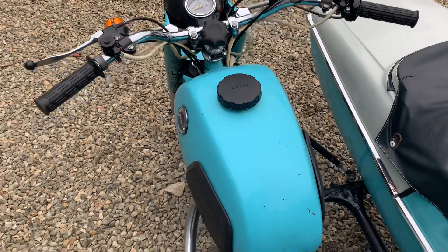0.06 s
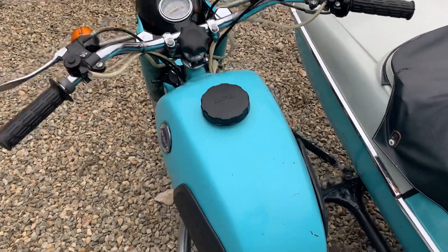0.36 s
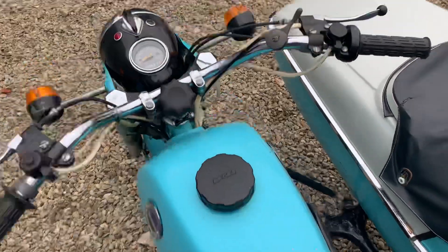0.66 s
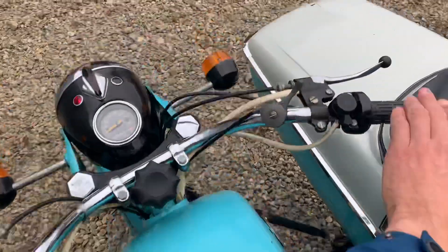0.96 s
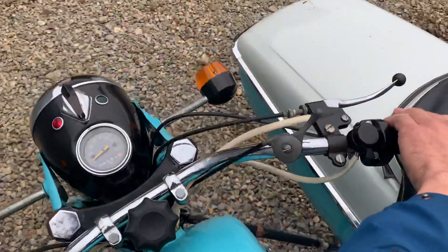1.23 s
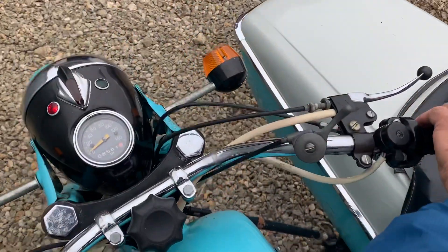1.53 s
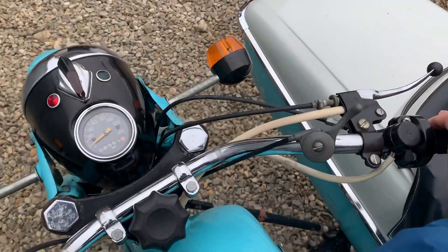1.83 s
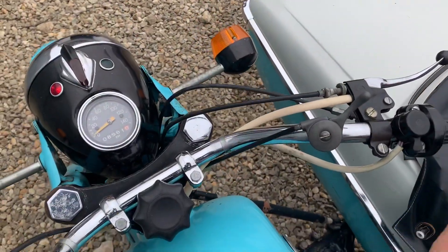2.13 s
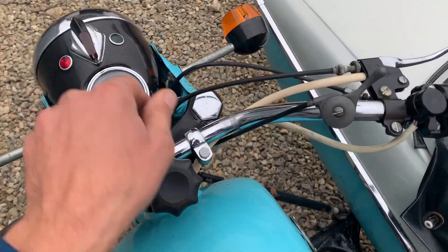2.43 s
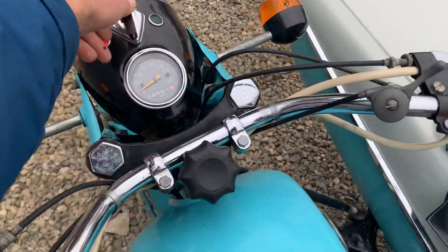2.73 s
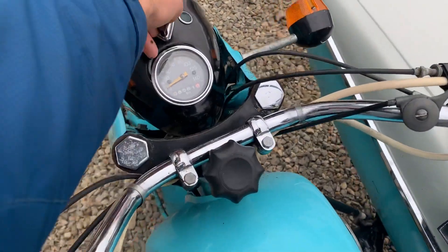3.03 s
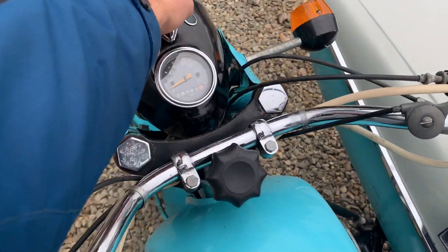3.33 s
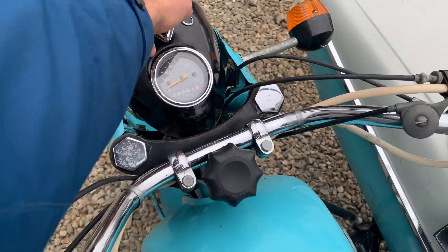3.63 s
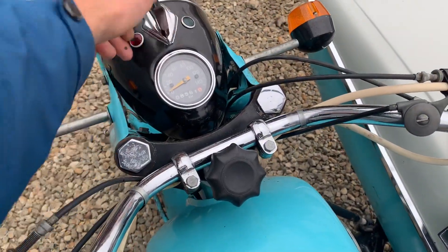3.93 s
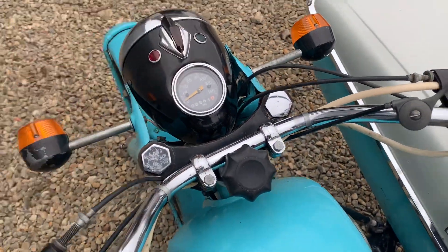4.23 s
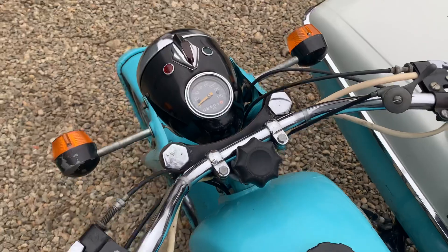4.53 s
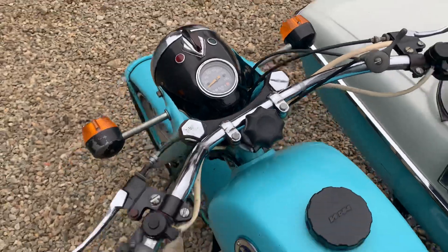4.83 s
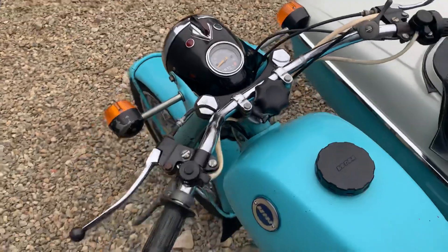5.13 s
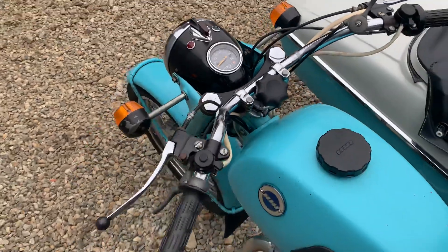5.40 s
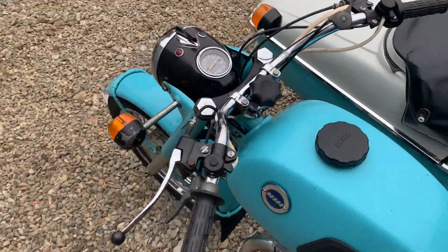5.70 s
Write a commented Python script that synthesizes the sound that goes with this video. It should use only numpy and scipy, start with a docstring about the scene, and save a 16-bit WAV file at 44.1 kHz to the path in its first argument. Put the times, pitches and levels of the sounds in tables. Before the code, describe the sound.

An old two-stroke motorcycle engine clatters and pulses at idle, firing only now and then, with ringing ticks from its metal parts. It revs briefly, catches once more, then winds down into separate knocks and soft rubbing hisses as it dies. The throttle grip and key click lightly along the way. The microphone is close above the handlebars, in quiet open air.

```python
"""Old two-stroke motorcycle, idling and running down

Outdoors, close up, a stereo microphone drifting above the handlebars. The single cylinder pumps
air and clatters on every turn but fires only now and then; a blip of throttle speeds it up.
Then it coasts, slows, and knocks over its last few compressions."""
import sys
import numpy as np
from scipy import signal
from scipy.fft import rfft, irfft
from scipy.io import wavfile
from scipy.ndimage import uniform_filter1d

SR = 44100
rng = np.random.default_rng(int(sys.argv[2]) if len(sys.argv) > 2 else 0)


def master_out(mix):
    """Clip the mix to full scale and print it as 16-bit PCM to the path in sys.argv[1]."""
    frames = np.transpose(np.atleast_2d(mix))
    ceiling = np.clip(frames, -1, 1)
    pcm = np.round(ceiling * 32767).astype(np.int16)
    wavfile.write(sys.argv[1], SR, pcm)


N = 254016
TIME, HZ = np.arange(N) / SR, np.fft.rfftfreq(N, 1 / SR)

# Charges that catch (all table levels are relative): start_s, bark_db, spit_db, boom_db, pitch_ratio
FIRINGS = [(0.287, -16, -27.5, -16, 0.98), (0.353, -19.5, -37, -22, 0.98), (0.414, -14.5, -25.5, -15, 0.99),
           (.95, -11.5, -20.5, -15, 1.03), (1.016, -12.5, -29, -16, 0.97), (1.47, -19.5, -58, -14, 0.98),
           (1.571, -25.5, -54, -10, 1.17), (1.611, -10.5, -16, -10, 1.02), (1.659, -16, -29, -5, 1.16),
           (1.711, -11.5, -21.5, -2, 1.07), (1.762, -11, -16.5, -9, 1.13), (1.781, -13.5, -33, -4, 0.9),
           (1.804, -15.5, -17, -11, 1.07), (1.845, -11, -21, -23, 1.07), (1.878, -15, -29, -12, 1.13),
           (2.545, -18, -40, -18, 0.81), (2.583, -13, -13.5, -35, 1.1), (2.623, -12.5, -19, -35, 1.03),
           (3.165, -18, -44, -23, 0.99)]
# Hiss of rubbing, rattling metal: frequency_hz, level_db
SIZZLE_SPECTRUM = [(1500, -38), (3200, 4.5), (4500, 1.5), (5500, -0.5), (7000, 0.5), (8500, -19),
                   (10300, 0), (12000, -11), (13500, -25), (15500, -18.5)]
# Bright hiss of a firing or a click: frequency_hz, level_db
SPIT_SPECTRUM = [(200, -20), (1000, -5), (3000, -2), (5000, -8), (7000, -0.5), (8500, -13.5), (10500, -1),
                 (13000, -8), (16000, -13)]


def pumping(turns, speed, push_angle=.6):
    """The piston pumps air on every turn: an even drone at speed, a thump and fluttering gas when slow."""
    # The gas path's three answers to a push: frequency_hz, level_db, delay_s
    thump_path = [(25.3, -32, -0.0039), (46, -25, -0.0215), (62.8, 2, 0.0137), (83, 0.5, 0.0082),
                  (99.3, 2, -0.0035), (118, -28, -0.039), (194, -26, -0.081)]
    chuff_path = [(57.4, -97, 0.00075), (108, 2, -0.0037), (120, 2, -0.01485), (171, 0, -0.0245),
                  (239.4, -9, -0.0297), (261, -6.5, -0.0152), (286, 1, -0.0139), (333, -11.5, -0.0137),
                  (365, -4, -0.0166), (390, -29, -0.00026), (633, -37, -0.015), (1250, -51, -0.019)]
    airbox_path = [(61.3, -55, 0.002), (103, -17, 0.00059), (138.2, 2, 0.000019), (148.3, -2, 0.0058),
                   (180, -41, 0.0041), (404, -83, 0.14)]
    # Turbulent gas: frequency_hz, level_db
    gust_spectrum = [(25, -13), (60, -8), (100, 5), (135, 3.5), (190, -1.5), (250, -2), (330, -3.5),
                     (450, -25.5), (900, -29), (3000, -56)]
    opening = throttle()
    thump = gas_pushes(turns, push_angle, thump_path, amp(-4.5 - .09 * np.maximum(speed - 17, 0)))
    chuff = gas_pushes(turns, push_angle, chuff_path, amp(.84 * (speed - 27)))
    airbox = gas_pushes(turns, .92, airbox_path, amp(1 + .43 * (speed - 25) + 6 * opening))
    roughness = np.interp(speed, [5, 9, 15, 18.5], [.25, .4, .55, .015])
    flutter = noise(gust_spectrum) * (.5 + lobe(turns, push_angle - .15, .19))
    gas = thump + np.sqrt(1 - roughness) * chuff + airbox
    # Levelled turn by turn, so the mix above sets only the tone.
    turn = turns.astype(int)
    turn_power = np.bincount(turn, gas ** 2) / np.bincount(turn)
    power = np.interp(turns, np.arange(turn[-1] + 1) + .5, turn_power)
    pulses = gas * np.sqrt((1 - roughness / 2) / (power + 1e-9)) * amp([[.5], [-.5]])
    airflow = pulses * amp(7.5 * opening) + np.sqrt(roughness) * flutter
    return airflow * speed_gain(speed, base_db=-24, rise_db=3.5, dying_speed=7.5, dying_db=10.5)


def gas_pushes(turns, angle, path, strength):
    """One slightly uneven push of gas a turn, smeared as its path delays each pitch differently."""
    times = np.interp(np.arange(angle, turns[-1], 1), turns, TIME)
    sizes = np.interp(times, TIME, strength) * amp(.3 * rng.standard_normal(len(times)))
    hz, db, delay_s = np.transpose(path)
    phase_lag = 2 * np.pi * np.cumsum(per_bin(np.c_[hz, delay_s])) * SR / N
    muffling = 1 / (1 + (HZ / 1200) ** 6)
    response = muffling * amp(per_bin(np.c_[hz, db])) * np.exp(-1j * phase_lag)
    return irfft(rfft(impulses(times, sizes)) * response, N)


def throttle(start_s=1.557, open_s=.022, hold_s=.1, close_s=.028):
    """One blip of the throttle, from shut (0) to open (1) and back."""
    return np.interp(TIME, start_s + np.cumsum([0, open_s, hold_s, close_s]), [0, 1, 1, 0])


def firings(rise_s=.0017):
    """A charge barks in the pipe with a rough blast of gas, spits hiss and booms in the air box."""
    # Resonances of the pipe: pitch_hz, width_hz, level_db
    pipe_modes = [(297.5, 28.3, 8.5), (261.7, 21, 0.5), (367, 48, -8), (681, 145, -5.5), (75, 32, 3.5)]
    # Blast of gas: frequency_hz, level_db
    blast_spectrum = [(40, -4), (70, 2), (200, 2), (380, 2), (550, -4), (850, -3.5), (1300, -25),
                      (3000, -38)]
    starts, bark_db, spit_db, boom_db, pitch_ratios = np.transpose(FIRINGS)
    bark, push = np.zeros(N), signal.unit_impulse(SR // 4)
    for start, size, ratio in zip(starts, amp(bark_db), pitch_ratios):
        at = int(start * SR)
        pipe = sum(amp(db) * gas_ring(push, hz * ratio, width, 37.4) for hz, width, db in pipe_modes)
        bark[at:at + len(push)] += size * pipe
    boom = gas_ring(impulses(starts, amp(boom_db)), hz=129, width_hz=19, onset_width_hz=120)
    spit = bursts(starts, spit_db, rise_s, decay_s=.012) * noise(SPIT_SPECTRUM)
    blast = bursts(starts, bark_db - 9, rise_s, decay_s=.028) * noise(blast_spectrum)
    return (stereo([bark, np.zeros(N)]) + boom) * amp([[.6], [-.6]]) + spit + blast


def gas_ring(x, hz, width_hz, onset_width_hz):
    """A gas resonance that builds up softly after each push."""
    return ring(ring(x, hz, width_hz), hz, onset_width_hz) * SR / (2 * np.pi * width_hz)


def clatter(turns, speed):
    """Piston, rings, bearings and chain rattle in the finned cases."""
    # Body of the cases: frequency_hz, level_db
    case_spectrum = [(200, 36.5), (400, 10), (490, 6), (620, 0.5), (1000, 4.5), (1600, -3), (2000, -4),
                     (2700, -1), (3700, -35), (5000, -51), (8000, -102)]
    low_cut = signal.butter(4, 380, "highpass", fs=SR, output="sos")
    coarse = rattle(turns, taps_per_s=1100, spread_db=1, decay_s=.0051, accent=.033)
    body = unit_rms(signal.sosfilt(low_cut, fins(colour(coarse, case_spectrum))))
    fine = rattle(turns, taps_per_s=2200, spread_db=2.2, decay_s=.0019, accent=.91)
    sizzle = unit_rms(fins(colour(fine, SIZZLE_SPECTRUM))) + amp(-7) * chain_tinkle(turns)
    sizzle *= speed_gain(speed, base_db=-38.5, rise_db=5.5, dying_speed=20, dying_db=3.5)
    metal = amp(3.23) * body + amp(-4) * piston_slaps(turns)
    metal *= speed_gain(speed, base_db=-32, rise_db=3.5, dying_speed=16, dying_db=5.5)
    # The level dips slightly after a firing.
    fired = impulses([row[0] for row in FIRINGS], np.ones(len(FIRINGS)))
    metal *= amp(-.5 * np.minimum(fade(fired, decay_s=.93), 1))
    # At a crawl the rattle swells with each stroke, and no two turns are equally hard.
    stroke_db = .5 * np.clip(1 - speed / 16, 0, 1) * np.cos(4 * np.pi * (turns - .52))
    turn_count = int(turns[-1]) + 1
    uneven_db = np.interp(turns, np.arange(turn_count), rng.standard_normal(turn_count))
    return amp(stroke_db + uneven_db) * (metal + sizzle)


def rattle(turns, taps_per_s, spread_db, decay_s, accent, parts=6):
    """Loose parts tap at random, a little harder as the piston changes sides; each has its own ring."""
    force = 1 + accent * lobe(turns, .026, .59) + .2 * lobe(turns, .29, 1)
    t, out = TIME[:3072], np.zeros((2, N))
    for _ in range(parts):
        hits = (rng.random(N) < taps_per_s / parts / SR) * rng.choice([-1, 1], N)
        size = amp(spread_db * np.minimum(rng.exponential(1, N), 3))
        response = rng.standard_normal((2, len(t))) * (np.exp(-t / decay_s) + .6 * np.exp(-t / .012))
        out += signal.oaconvolve((hits * size * force)[None], response, axes=1)[:, :N]
    return stereo(out)


def fins(x):
    """The cooling fins and cases ring along with the rattle."""
    # Their resonances: pitch_hz, width_hz, level_db
    fin_modes = [(768, 47, 0), (827.5, 20, 4), (985, 35, 1), (1277, 15, -2.5), (1480, 51, 6), (1662, 62, 1),
                 (2130, 34, -9), (2370, 250, -10), (3006, 37, -5), (3160, 25, -5.5), (4410, 400, -1),
                 (5100, 95, -16), (5700, 30, -3)]
    return x + sum(amp(db) * ring(x, hz, width) for hz, width, db in fin_modes)


def piston_slaps(turns, angle=.93, jitter_turns=.04, spread_db=3.5):
    """The piston slaps the barrel once a turn, never quite alike."""
    angles = np.arange(angle, turns[-1], 1)
    late, force = rng.standard_normal((len(angles), 2)).clip(-1, 1).T
    times = np.interp(angles + jitter_turns * late, turns, TIME)
    return unit_rms(barrel(times, amp(spread_db * force)))


def piston_ticks():
    """Now and then the piston strikes harder: the barrel rings under a short bright edge."""
    # Hardest blows: start_s, ring_db, edge_db
    blows = [(0.066, -23.5, -34), (0.271, -24, -51), (0.394, -34, -32.5), (.446, -23, -45),
             (.522, -24, -34), (.572, -22.5, -44), (0.641, -27, -36), (.713, -25, -47), (0.953, -35, -43),
             (1.027, -19, -37), (1.207, -30, -52), (1.296, -30, -50), (1.398, -26, -40), (1.595, -30, -33),
             (1.785, -19, -30), (1.872, -19, -33), (1.895, -16, -48), (2.033, -20.5, -49), (2.14, -38, -45),
             (2.211, -25, -41), (2.68, -35, -39), (2.759, -25, -38), (2.823, -27, -35), (2.875, -37, -42),
             (2.909, -26, -33), (3.07, -21, -44), (3.159, -29, -32), (3.244, -26, -32), (3.338, -24, -33),
             (3.426, -21, -35), (3.484, -25, -32), (3.589, -30, -30.5), (3.698, -20, -33),
             (3.778, -32, -31.5), (3.812, -23, -32), (3.946, -26, -32.5), (4.12, -26.5, -40),
             (4.248, -29, -42), (4.334, -23, -40.5)]
    # Their bright edge: frequency_hz, level_db
    edge_spectrum = [(1500, -25), (3600, -7), (4440, -1), (5500, -7), (7000, -10), (8500, -25),
                     (10500, -12), (15000, -41)]
    starts, ring_db, edge_db = np.transpose(blows)
    edges = bursts(starts, edge_db + 2, rise_s=.0015, decay_s=.02)
    return barrel(starts, amp(ring_db)) + edges * noise(edge_spectrum)


def barrel(times, sizes, spread_db=3, detune=.0058):
    """Each blow rings the barrel's modes in its own mix, a little off pitch."""
    # Resonances of the barrel: pitch_hz, width_hz, level_db
    barrel_modes = [(976, 32, -8.5), (1282.4, 17.6, -9.5), (1510, 17, -10.5), (1707, 15, -13),
                    (2060, 24, -21), (2423, 32, -19), (2933, 11, -17.5), (3294, 16, -19), (4260, 28, -17.5),
                    (4500, 20, -20), (5080, 30, -21)]
    hz, width, db = np.transpose(barrel_modes)
    mix, offset = rng.standard_normal((len(times), 2, len(hz))).clip(-1.5, 1.5).transpose(1, 0, 2)
    gains = sizes[:, None] * amp(db + spread_db * mix)
    pitches = hz * (1 + detune * offset)
    decays = np.tile(1 / (np.pi * width), len(times))
    return chime(np.repeat(times, len(hz)), gains.ravel(), pitches.ravel(), decays)


def chain_tinkle(turns, count=1000, low_hz=1800, high_hz=7500, decay_s=.007, spread_db=5):
    """Chain rollers and loose fittings tinkle, each at its own pitch, more often at speed."""
    # Tone of the tinkling: frequency_hz, level_db
    tinkle_spectrum = [(1800, 1.5), (2500, 3), (3700, -3), (4500, 4.5), (5400, -4), (7500, 1)]
    when, height, force = rng.random((count, 3)).T
    times = np.interp(when * turns[-1], turns, TIME)
    pitches = low_hz * (high_hz / low_hz) ** height
    tones = chime(times, amp(spread_db * force), pitches, np.full(count, decay_s))
    return unit_rms(colour(tones, tinkle_spectrum))


def pings():
    """Thin loose parts are jolted and ring out above the clatter."""
    # Jolts: start_s, level_db, pitch_hz, decay_s
    jolts = [(0.072, -51, 2510, 0.32), (.083, -31, 4470, 0.017), (.135, -33, 4400, 0.015),
             (.27, -41, 2573, 0.16), (.283, -37, 4440, 0.012), (.345, -30, 4800, 0.017),
             (.43, -34, 5080, 0.013), (.575, -40, 5000, 0.014), (.66, -34, 4270, .014),
             (.755, -34, 4450, .016), (.82, -35, 4520, 0.016), (.89, -41, 4550, 0.014),
             (1.019, -27.5, 4550, 0.024), (1.03, -34, 2600, 0.18), (1.1, -38, 4400, 0.018),
             (1.205, -42, 4470, .016), (1.329, -33, 4550, 0.02), (1.39, -34, 4550, .016),
             (1.604, -26, 4470, 0.015), (1.805, -28, 4530, .012), (1.875, -21, 4400, .014),
             (2.074, -30, 4380, .014), (2.147, -31, 4520, .018), (2.224, -29, 4450, 0.016),
             (2.3, -33, 4540, .03), (2.37, -32, 4430, 0.037), (2.462, -28, 4470, 0.054),
             (2.519, -31, 4420, 0.036), (2.656, -31, 4600, .014), (2.73, -41, 4320, .014),
             (2.801, -39, 4600, .014), (2.991, -28, 4480, 0.013), (3.156, -30, 4400, .014),
             (3.391, -35, 4520, 0.016), (3.44, -31, 4330, .014), (3.875, -32, 4500, .014),
             (3.965, -32, 4600, 0.019), (4.04, -35, 4500, .016), (4.473, -29, 5300, .008)]
    starts, db, hz, decays = np.transpose(jolts)
    return chime(starts, amp(db), hz, decays)


def drive_knocks(speed, rise_s=.0007, decay_s=.004, tail_s=.042, tail_share=.17):
    """Slack in the drive closes with a gritty chatter; some knocks rebound, later as the crank slows."""
    # Piston and chain knocks: start_s, level_db, clink_hz, clink_share, rebound_ratio, chatter_s
    knocks = [(4.249, -35, 2900, .3, 0, .005), (4.334, -42, 2570, 0.1, 0, .006),
              (4.419, -42, 2720, .5, 0, 0.007), (4.444, -38, 2530, 0.4, 0, 0.0065),
              (4.475, -33, 2900, 0.02, 0.1, 0.01), (4.569, -34, 2920, 0.1, 0.93, 0.012),
              (4.606, -37, 1500, 0, 0, 0.021), (4.672, -38.5, 3530, 0.02, 0.67, 0.0074),
              (4.745, -34.5, 2200, 0.03, 0.77, 0.016), (4.875, -32, 3280, 0.97, 0, 0.0048),
              (4.897, -32.5, 1410, 0.06, 0.9, 0.0096), (5.003, -41, 3350, 0.13, 0, 0.0085),
              (5.07, -33, 1570, 0.16, 0.72, 0.021), (5.195, -48, 3260, 0.2, 0, 0.009),
              (5.262, -31, 1500, 0.46, 0.89, 0.013), (5.438, -39, 1560, 0, 0, 0.015),
              (5.501, -32, 1560, 0.3, 0.84, 0.021), (5.741, -35, 3800, 0.3, 0.46, 0.015)]
    # Their chatter: frequency_hz, level_db
    chatter_spectrum = [(100, 6), (300, 1.5), (550, 1), (800, 3.5), (1100, -3.5), (1520, 3.5), (1750, -4),
                        (1900, -10), (2200, -3), (2900, -12.5), (3500, -19), (4000, -12), (5000, -29),
                        (10000, -33), (16000, -50)]
    out, chatter = np.zeros((2, N)), noise(chatter_spectrum)
    white = unit_rms(stereo(rng.standard_normal((2, N))))
    grit_db = 2.6 * unit_rms(uniform_filter1d(rng.standard_normal(N), size=90))
    for start, db, hz, share, rebound, chatter_s in knocks:
        gap_s = max(.063 - .0076 * np.interp(start, TIME, speed), 0)
        span = slice(int(start * SR), int(start * SR) + SR // 5)
        power = 0
        for onset, size in (start, 1), (start + gap_s, rebound):
            t = np.maximum(TIME[span] - onset, 0)
            after = np.maximum(t - chatter_s, 0)
            release = (1 - tail_share) * np.exp(-after / decay_s) + tail_share * np.exp(-after / tail_s)
            power += (size * (1 - np.exp(-t / rise_s)) * release) ** 2
        clink = unit_rms(ring(ring(white[:, span], hz, width_hz=260), hz, width_hz=520))
        texture = np.sqrt(1 - share) * chatter[:, span] + np.sqrt(share) * clink
        out[:, span] += amp(db + 3) * np.sqrt(power) * texture
    return out * unit_rms(amp(grit_db))


def ring_rasps():
    """The piston rings slide along the barrel with a soft hiss between the last compressions."""
    # Slides: start_s, length_s, level_db
    slides = [(4.652, 0.061, -41.5), (4.803, 0.074, -40.5), (4.919, .04, -42), (4.997, 0.033, -43),
              (5.364, 0.066, -46), (5.422, 0.049, -41.5)]
    swell = sum(amp(db - 3) * np.sin(np.pi * np.clip((TIME - start) / length, 0, 1))
                for start, length, db in slides)
    return swell * noise(SIZZLE_SPECTRUM)


def handlebar_clicks():
    """The throttle grip and ignition key give small sharp clicks."""
    # Clicks: start_s, level_db
    clicks = [(0.669, -27.5), (1.275, -21.5), (2.734, -24), (2.812, -26), (3.232, -37), (4.47, -24),
              (5.749, -29)]
    starts, db = np.transpose(clicks)
    return fade(impulses(starts, amp(db)), decay_s=.0022) * noise(SPIT_SPECTRUM)


def outdoor_air():
    """A quiet, steady rumble and hiss behind the engine."""
    # Open air: frequency_hz, level_db
    air_spectrum = [(30, 8), (130, 4), (300, -8), (550, -7), (1500, -26), (2500, -25), (7000, -42),
                    (11000, -26), (15000, -48)]
    return amp(-46) * noise(air_spectrum)


def stereo(pair):
    """Two unrelated sounds become the partly alike left and right of the microphone."""
    # Likeness of the channels: frequency_hz, coherence
    likeness = [(60, 0.44), (250, 0.98), (500, 0.85), (1000, 0.93), (2000, 0.11), (5000, 0.036),
                (10000, 0.34)]
    # Phase of the left ahead of the right: frequency_hz, lead_rad
    left_lead = [(100, -0.28), (400, -0.71), (1000, -0.87), (2000, -1.03), (4000, -0.51), (10000, -1.63)]
    left, other = rfft(pair)
    same = per_bin(likeness)
    right = (same * left + np.sqrt(1 - same ** 2) * other) * np.exp(-1j * per_bin(left_lead))
    return irfft(np.array([left, right]), N)


def chime(times, sizes, pitches, decays, rise_s=.0004, lead_rad=.9):
    """Each event rings one dying tone, which reaches left and right out of step."""
    out, scatter = np.zeros((2, N)), rng.standard_normal((len(times), 2))
    for start, size, hz, decay, (cycles, skew) in zip(times, sizes, pitches, decays, scatter):
        span = out[:, max(int(start * SR), 0):][:, :int(5 * decay * SR)]
        t = TIME[:span.shape[1]]
        phase = 2 * np.pi * cycles + np.array([[0], [lead_rad + skew]])
        span += size * np.exp(-t / decay) * (1 - np.exp(-t / rise_s)) * np.sin(2 * np.pi * hz * t + phase)
    return out


def speed_gain(speed, base_db, rise_db, dying_speed, dying_db, idle_speed=15):
    """Gains rise_db per doubling of speed; loses a further dying_db per halving below dying_speed."""
    crawl = np.maximum(np.log2(dying_speed / speed), 0)
    return amp(base_db + rise_db * np.log2(speed / idle_speed) - dying_db * crawl)


def lobe(turns, angle, width):
    """A smooth swell at one crank angle; angle and width are in turns."""
    return np.exp((np.cos(2 * np.pi * (turns - angle)) - 1) / (2 * np.pi * width) ** 2)


def bursts(times, db, rise_s, decay_s):
    """An envelope that rises and dies away at each event."""
    hits = impulses(times, amp(db))
    return fade(hits, decay_s) - fade(hits, rise_s)


def impulses(times, sizes):
    """A train of impulses."""
    return np.bincount(np.clip(np.round(np.asarray(times) * SR), 0, N - 1).astype(int), sizes, N)


def fade(x, decay_s):
    """Gives each impulse an exponential tail."""
    return signal.lfilter([1], [1, -np.exp(-1 / (decay_s * SR))], x)


def ring(x, hz, width_hz):
    """A resonance of gain 1."""
    return signal.lfilter(*signal.iirpeak(hz, hz / width_hz, SR), x)


def noise(spectrum):
    """Coloured stereo noise of rms 1."""
    return unit_rms(stereo(colour(rng.standard_normal((2, N)), spectrum)))


def colour(x, spectrum):
    """Filters by a broad spectrum."""
    return irfft(rfft(x) * amp(per_bin(spectrum)), N)


def per_bin(rows):
    """A table of frequencies and values, at every frequency bin."""
    hz, value = np.transpose(rows)
    return np.interp(np.log(HZ + 1), np.log(hz), value)


def amp(db):
    """Decibels to gain."""
    return 10 ** (np.asarray(db) / 20)


def unit_rms(x):
    """Scales to rms 1."""
    return x / np.sqrt(np.mean(x ** 2) + 1e-20)


def scene():
    """The turning crank drives gas and metal alike, over quiet outdoor air."""
    # The crank, wound up by runs of firings and dragged down by friction: time_s, turns_per_s
    crank_speed = [(0.0, 15.21), (0.23, 14.89), (0.5, 16.17), (0.91, 13.82), (1.07, 16.6), (1.53, 13.91),
                   (1.67, 17.49), (1.92, 30.4), (2.3, 26.2), (2.58, 23.32), (2.7, 28.1), (3.11, 23.37),
                   (3.19, 23.27), (3.93, 15.25), (4.64, 6.78), (5.2, 5.15), (5.39, 4.13), (5.57, 3.9),
                   (5.76, 1.5)]
    # The microphone drifts from above the tank to the headlamp and back: time_s, gain_db
    nearness = [(0, 0.5), (.45, 1.5), (.8, -0.5), (1.45, -1.5), (1.9, 0), (2.9, 1.5), (3.8, -1), (4.3, 2),
                (5.7, -4.5)]
    speed = np.interp(TIME, *np.transpose(crank_speed))
    turns = np.cumsum(speed) / SR
    engine = (pumping(turns, speed) + firings() + clatter(turns, speed) + piston_ticks()
              + pings() + drive_knocks(speed) + ring_rasps())
    engine *= amp(np.interp(TIME, *np.transpose(nearness)))
    return engine + handlebar_clicks() + outdoor_air()


def record(dry):
    """The microphone loses the deepest bass and the recorder cuts the highest treble."""
    # Microphone response: frequency_hz, gain_db
    mic_response = [(20, -12), (31, 0), (42, -5.5), (100, 0.5)]
    low_pass = signal.firwin(511, 15900, window=("kaiser", 9), fs=SR)
    return signal.oaconvolve(colour(dry, mic_response), low_pass[None], "same")


dry = scene()
out = record(dry)
master_out(out)
```